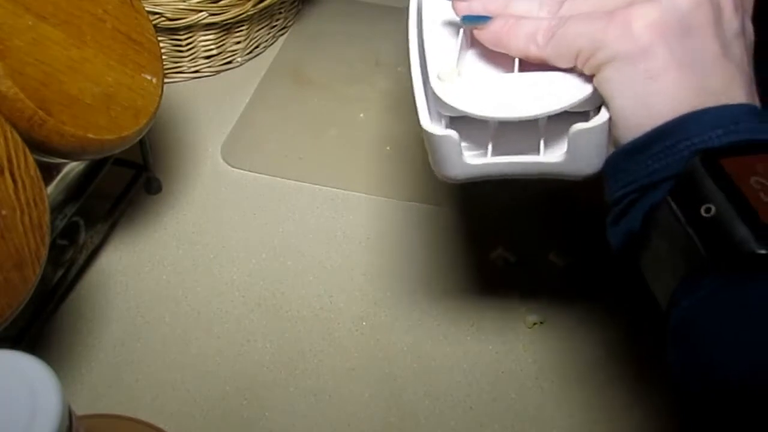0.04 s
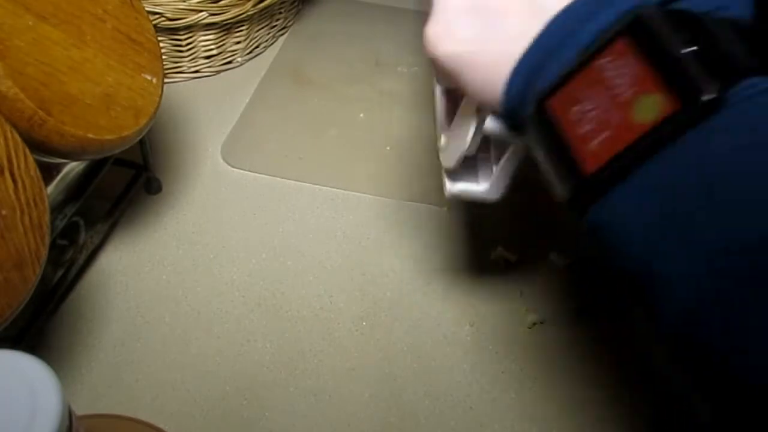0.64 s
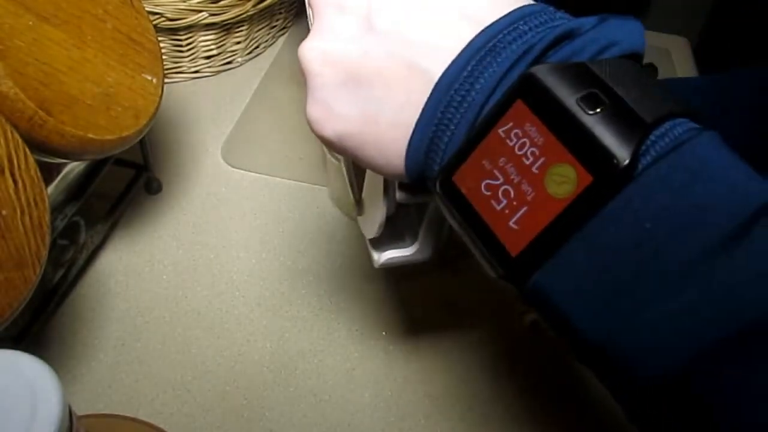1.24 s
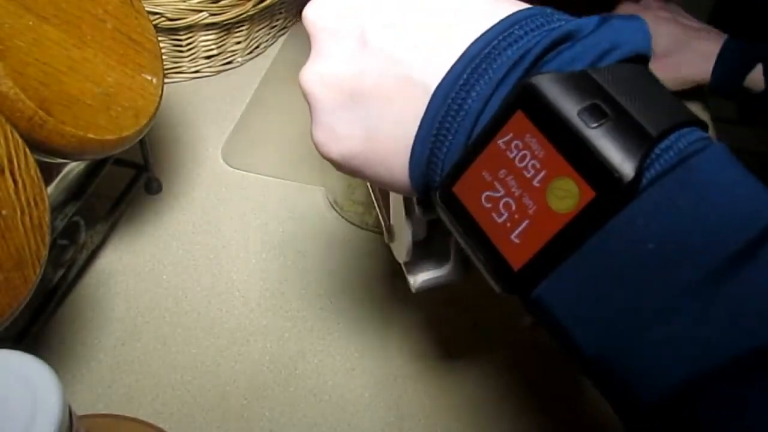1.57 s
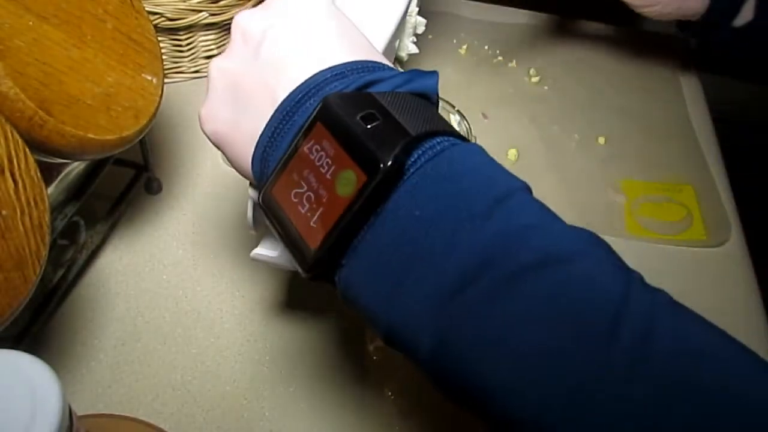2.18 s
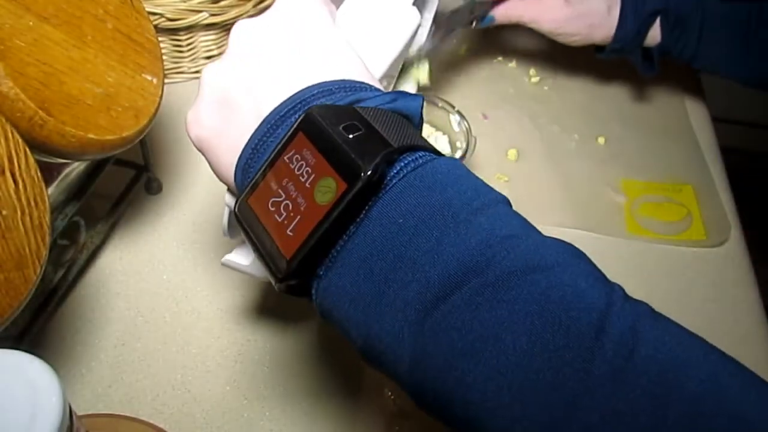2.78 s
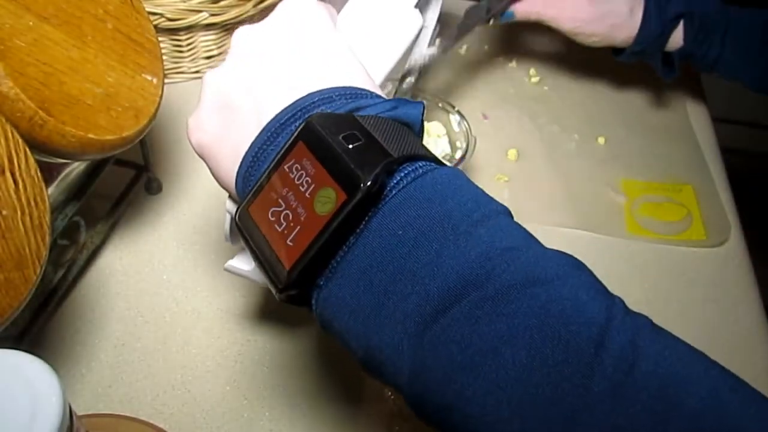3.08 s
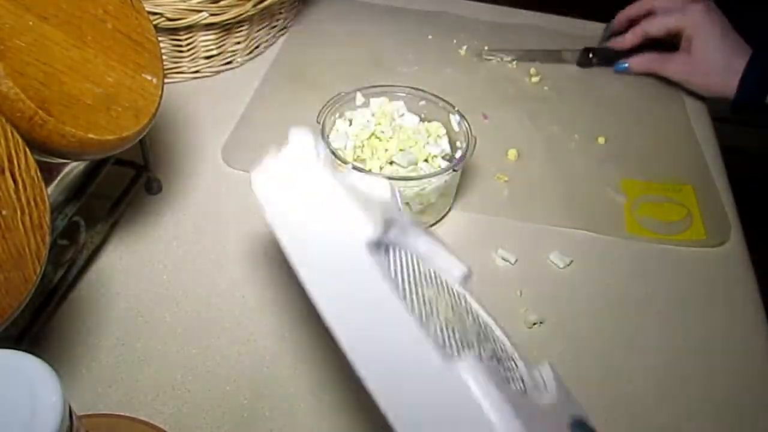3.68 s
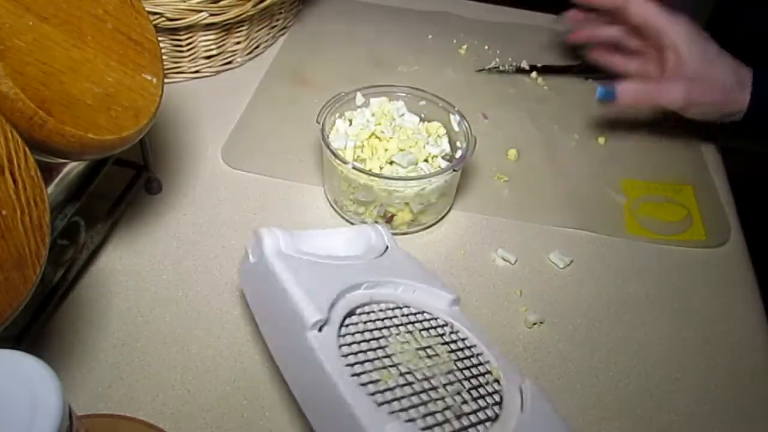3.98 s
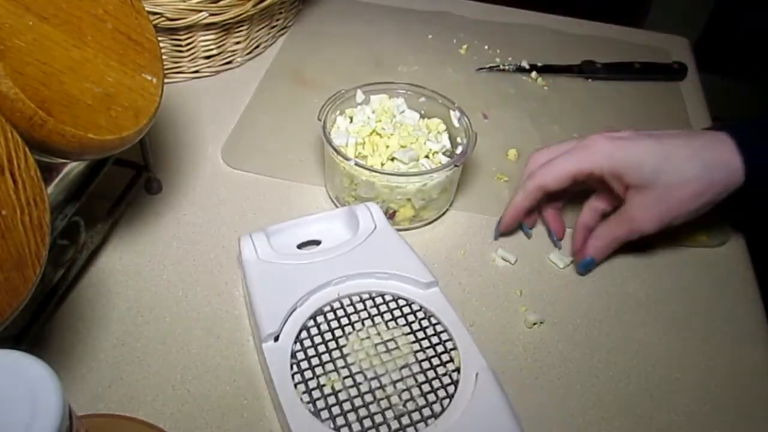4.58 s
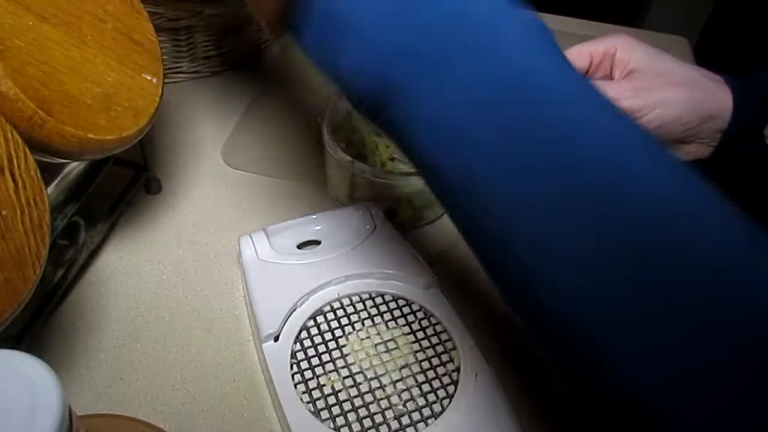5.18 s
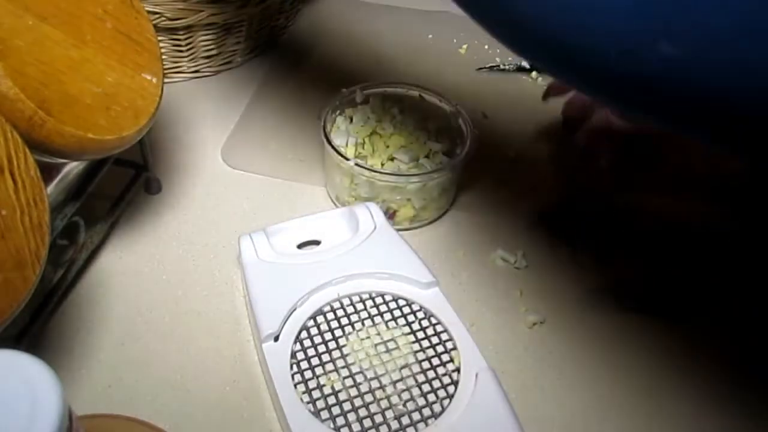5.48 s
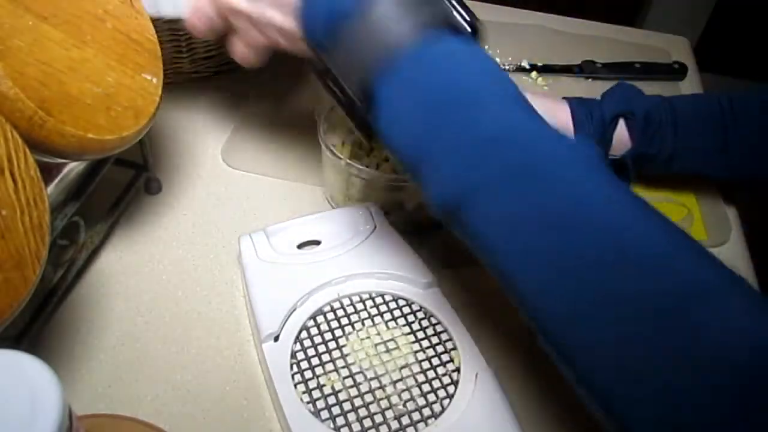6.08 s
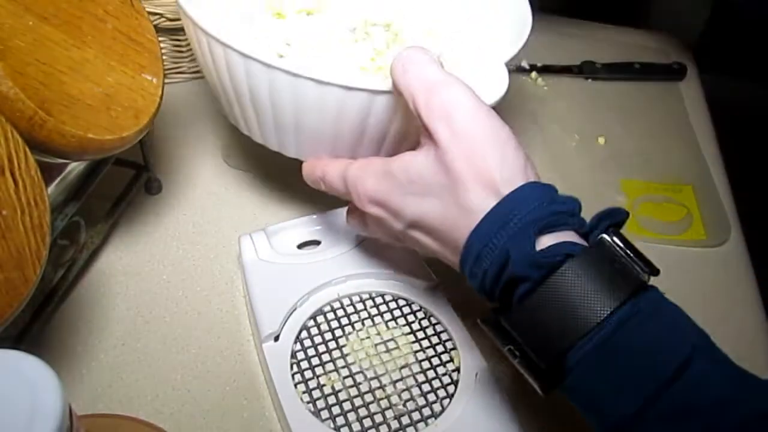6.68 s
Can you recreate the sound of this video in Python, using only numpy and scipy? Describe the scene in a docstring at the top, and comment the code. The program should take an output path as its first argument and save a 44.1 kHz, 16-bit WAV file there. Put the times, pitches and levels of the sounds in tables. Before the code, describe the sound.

A plastic vegetable chopper clacks, scrapes and is set down on a kitchen counter, then a cup slides and knocks against a bowl.

```python
"""A plastic dicing chopper is opened, scraped with a knife and laid on a kitchen counter.
Each impact excites damped modes: the shell clacks, the counter thumps, and the hardest blow rings the
blade grid. A cup and a bowl are knocked, slid and lifted; edges snap and stick-slip friction rasps.
A sleeve swishes and the small, reverberant room hums. The microphone's gain control ducks after
hard knocks, too late to keep their first swing from clipping."""
import sys
import numpy as np
from scipy import signal
from scipy.io import wavfile
from scipy.ndimage import minimum_filter1d

SR = 44100
rng = np.random.default_rng(int(sys.argv[2]) if len(sys.argv) > 2 else 0)


def wav_out(sig):
    """Save sig, one row per channel (or a flat mono array), as 16-bit PCM at SR to the path in sys.argv[1]."""
    wavfile.write(sys.argv[1], SR, np.round(np.clip(np.atleast_2d(sig).T, -1, 1) * 32767).astype(np.int16))


N = 306054
TIME = np.arange(N) / SR
BANDS_HZ = 32 * 2 ** (np.arange(28) / 3)   # third-octave centres
BAND_FILTERS = [signal.butter(2, [hz / 2 ** (1 / 6), hz * 2 ** (1 / 6)], "band", fs=SR, output="sos")
                for hz in BANDS_HZ]

# Chopper impacts: start_s, level_db, bass_db, treble_db, length_ratio, thump_db, clack_hz
CHOPPER_KNOCKS = [(1.261, 4, 2, 3.5, 0.88, -46, 836), (1.287, -17, 7, -5, .8, -48, 1200),
                  (1.3323, -6, 8.5, -30, 0.71, -50, 560), (1.638, -33, 9, 7, .8, -50, 250),
                  (2.591, -14, 4, 0, 0.8, -7.5, 990), (2.657, -22, 6.5, -12, 0.84, -16.5, 1090),
                  (2.860, -12, -2, 10, 0.59, -17.5, 1100), (2.873, -21, 5, -2, 0.88, -28, 1160),
                  (3.9417, -5, 6, 6, 0.54, -15, 1510), (3.971, -19.5, 0, -5, .8, -28, 650),
                  (4.2853, -12, 5.5, 7, 0.89, -18.5, 646), (4.3283, -7.5, -2.5, 6.5, 0.86, -10, 720),
                  (4.3753, -5, -7, -13, 0.63, -16, 950), (4.418, -16, 3.5, -6, 0.68, -22, 1190),
                  (4.432, -16.5, -4, -31, 0.86, -20, 710), (4.501, -21.5, -10, -3, 1, -50, 605),
                  (4.601, 0, -3.5, -19, 0.71, -12, 1080), (6.1344, -21, 4, 6, 0.68, -45, 331)]
# Cup and bowl impacts: start_s, level_db, bass_db, treble_db, pock_hz, pock_db, ring_db
CUP_TAPS = [(.241, -51, -12, 10, 910, -28, -33), (.265, -41, -12, 4, 960, -34, -28.5),
            (.416, -23, -6, 7, 874, -13.5, -23), (.698, -38, -10, 14, 934, -23.5, -50),
            (.847, -42, -10, 19, 1008, -32, -49), (3.497, -35.5, -10, -8, 990, -33.5, -58),
            (5.708, -30.5, -6, -5, 900, -35, -44), (5.736, -18, -3, 1, 808, -16, -35),
            (5.917, -8, -8.5, -26.5, 800, -16, -28), (6.516, 1, 11, -7, 910, -16, -3)]
# Knife and plastic edges snapping past each other: start_s, level_db, treble_db, pitch_hz
EDGE_SNAPS = [(1.639, -24, 15, 2420), (1.711, -28.5, 13.5, 8970), (2.244, -51, 22.5, 11500),
              (2.478, -19.5, 5, 1530), (2.561, -19.5, -18, 1730), (2.829, -16, -6, 1664),
              (2.841, -12.5, -7, 1080), (2.849, -20, 2, 2150), (3.683, -28.5, 2, 1850),
              (3.713, -30.5, 13, 1530), (4.2234, -25, 9.5, 4430), (6.097, -13, -3.5, 1820),
              (6.104, -26, 18.5, 2200), (6.134, -8.5, 4.5, 2410), (6.151, -19, 4, 2150),
              (6.171, -20.5, 19, 2930), (6.188, -18, 8, 3080), (6.214, -26.5, 20, 4500),
              (6.315, -27.5, 12.5, 1930), (6.328, -28.5, 10.5, 2880), (6.759, -32.5, 11.5, 4550)]
# Dragged contacts: start_s, level_db, pitch_hz, length_ratio
CONTACT_CREAKS = [(0.251, -38, 3030, 3.5), (0.812, -42, 3230, 3), (1.782, -42, 2030, 1.2),
                  (2.549, -28, 1290, 2.2), (2.707, -24, 1457, 3.6), (2.778, -26, 2010, 2.5),
                  (2.809, -27, 1210, 1.8), (3.631, -35.5, 1970, 1.2), (3.732, -35.5, 1560, 2.3),
                  (4.147, -31, 2124, 4), (4.216, -29.5, 2410, 5.7), (4.27, -20.5, 3070, 2.4),
                  (4.601, -15.5, 2390, 2.1)]

# Friction strokes: start_s, peak_db, swell_s, fade_s (time to fall by 20 dB)
GRITTY_SCRAPES = [(1.635, -38.5, 0.019, 0.25), (1.765, -40, .025, 0.027), (3.68, -35, 0.046, 0.04),
                  (5.73, -28.5, 0.24, 0.019), (6.085, -23.5, 0.073, 0.11), (6.28, -32, 0.081, 0.052)]
CUP_JUDDERS = [(6.09, -22, .05, 0.049)]
WALL_RUBS = [(0, -45.5, 0.0027, 0.16), (.205, -33, .05, 0.048), (.57, -45, 0.04, .03),
             (.645, -41.5, 0.017, .04)]
KNIFE_SKIMS = [(1.695, -39, .015, .05), (1.86, -52, .02, .06), (2.185, -49, .015, 0.088),
               (2.24, -71, .015, .04)]
SLEEVE_SWISHES = [(4.98, -49.5, .18, 0.27), (5.27, -54.5, 0.11, 0.83)]

# Distinct modes of each body: pitch_hz, level_db, t60_s
CHOPPER_SHELL_MODES = [(212, -20, 0.02), (416, 4.5, 0.0058), (2056, -14.5, 0.031), (4680, -31, 0.042)]
BLADE_GRID_MODES = [(190, -39.5, 0.28), (248, 3, 0.17), (338, -2, 0.43), (477.3, -0.5, 0.3),
                    (790, -8, 0.37), (980, 0, 0.21), (1120, 3, 0.11), (1210, 5, 0.059), (1323, 2, 0.12),
                    (2165, -25, 0.4), (2260, -26, 0.2), (6570, -19, 0.22)]
COUNTERTOP_MODES = [(80.3, -4.5, 0.33), (93, -4.5, 0.091)]
CUP_FLEX_MODES = [(708, 4.5, 0.01), (882, -6.5, 0.14), (950, -5, 0.034), (500, -13.5, 0.13),
                  (383, -13, 0.053), (684, -11.5, 0.0172)]
CUP_WALL_MODES = [(557, -36.5, 0.35), (824, -17, 0.57), (912, -7.5, 0.21), (922, -5, 0.32),
                  (955, -13.5, 0.42), (1068, -8, 0.15), (1305, -36, .05), (2150, -23, .15),
                  (2195, -30, 0.26), (3165, -15.5, 0.075)]
GRIPPED_CUP_MODES = [(897, 2, 0.054), (970, -2.7, 0.061), (1070, -3, 0.037), (4750, -6, 0.014)]

# Spectral densities of dense modes, friction and room noise: frequency_hz, density_db
CHOPPER_SPECTRUM = [(40, -10), (100, -22), (200, 8), (540, -11.5), (900, 6), (1500, -6.5), (2050, -3),
                    (2900, -16.5), (3900, -12), (4600, -18), (6500, -32.5), (9500, -26.5), (14000, -54)]
CUP_SPECTRUM = [(40, -51), (200, -23), (450, -6), (620, -31), (880, 8), (1400, -6), (2100, -1.5),
                (3300, -5), (4100, -6), (5000, -13.5), (7500, -46), (10000, -22.5), (14000, -62)]
EDGE_SPECTRUM = [(40, -5), (250, -1), (650, -2), (1100, 5.5), (2100, 2), (3200, -2.5), (3900, -4.5),
                 (4600, -3.5), (7500, -19), (10500, -7), (13000, -22), (16000, -38)]
GRIT_SPECTRUM = [(40, -12), (400, 0), (1000, 3), (2200, 0.5), (3300, 1.5), (3900, 1.5), (4700, 1.5),
                 (7500, -10.5), (9500, 1), (12000, -13.5), (14000, -23), (16000, -31)]
CUP_JUDDER_SPECTRUM = [(60, -23.5), (190, -1), (330, 9.5), (600, -31), (2200, -0.5), (5000, -47),
                       (14000, -47)]
KNIFE_SPECTRUM = [(2000, -25), (6000, -9), (9500, -1), (12500, 0), (15000, -20)]
CLOTH_SPECTRUM = [(200, -13), (1000, -1), (3000, 7), (5500, -2.5), (9000, -15), (15000, -14)]
AIR_SPECTRUM = [(15, -38), (25, -6), (113, -1), (144, -6), (183, 2.5), (233, -16.5), (331, -6.5),
                (782, -19), (1050, -18.5), (2170, -27.5), (3530, -29), (3930, -30.5), (5280, -32.5),
                (11500, -40.5), (15500, -58)]

# Decay of dense modes, before scaling by a contact's length ratio: frequency_hz, t60_s
BODY_DECAY = [(60, 0.34), (250, 0.1), (1000, 0.061), (3000, 0.053), (12000, 0.052)]
EDGE_DECAY = [(200, 0.06), (2000, 0.044), (12000, 0.028)]
# Reverberation time: frequency_hz, t60_s
ROOM_DECAY = [(80, 0.26), (400, 0.6), (2000, 0.45), (5000, 0.58), (13000, 0.19)]
# Colour of the reverberation: frequency_hz, density_db
ROOM_SPECTRUM = [(60, 1), (300, -4.5), (1000, 0.5), (4000, -1.5), (13000, 2)]
# Extra stereo spread, side relative to mid: frequency_hz, spread_db
STEREO_WIDTH = [(60, -9), (250, 1.5), (2000, 3), (5000, 3.5), (10000, 6.5), (14000, 7)]


def chopper(clack_db=3.5, clack_t60_s=0.011):
    """Impact excitation: a blow sets the shell's modes vibrating and drives those of the counter."""
    start_s, level_db, _, _, length_ratio, thump_db, clack_hz = np.transpose(CHOPPER_KNOCKS)
    shell = ring(impulses(start_s, level_db), CHOPPER_SHELL_MODES)
    shell = shell + clatter(CHOPPER_KNOCKS, CHOPPER_SPECTRUM, length_ratio)
    # The point of contact decides which panel takes the blow, and so the pitch of the clack.
    for at_s, db, hz in zip(start_s, level_db, clack_hz):
        add(shell, at_s, ping(hz, db + clack_db, clack_t60_s))
    counter = ring(impulses(start_s, thump_db), COUNTERTOP_MODES)
    return radiated(shell + blade_grid(), low_hz=156) + counter


def blade_grid(start_s=1.261, strike_db=-11.5, blade_hz=3370, spread_ratio=0.048, count=12):
    """Beating: nearly alike blades ring at slightly different pitches, beside the grid's own modes."""
    detune = spread_ratio * (np.linspace(-1, 1, count) + rng.uniform(-1, 1, count) / count)
    blade_modes = [(hz, -14, 0.37) for hz in blade_hz * (1 + detune)]   # pitch_hz, level_db, t60_s
    return ring(impulses(start_s, strike_db), BLADE_GRID_MODES + blade_modes)


def cup_and_bowl(clatter_db=-4.0, length_ratio=0.84, pock_t60_s=0.078):
    """Hollow-body resonance: a pock whose pitch depends on the grip, and a wall ringing near 900 Hz."""
    start_s, level_db, *_, ring_db = np.transpose(CUP_TAPS)
    body = from_db(clatter_db) * clatter(CUP_TAPS, CUP_SPECTRUM, [length_ratio] * len(CUP_TAPS))
    for at_s, *_, pock_hz, pock_db, _ in CUP_TAPS:
        add(body, at_s, -ping(pock_hz, pock_db, pock_t60_s))
    flex = ring(impulses(start_s, level_db), CUP_FLEX_MODES)
    wall = ring(impulses(start_s, ring_db), CUP_WALL_MODES)
    return radiated(body - flex - wall, low_hz=262)


def edge(level_db, pitch_hz, length_ratio, bass_db, treble_db, ring_db):
    """Free vibration: a released edge sounds a burst of dense modes around one resonance."""
    peak_db = 6.5 * np.exp(-(np.log2(BANDS_HZ / pitch_hz) / 0.29) ** 2)   # 0.29 octave to each side
    gains = band_gains(EDGE_SPECTRUM) * from_db(level_db + shelves(bass_db, treble_db) + peak_db)
    burst = dense_modes(gains, length_ratio * by_band(EDGE_DECAY))
    return burst + ping(pitch_hz, level_db + ring_db, t60_s=length_ratio * 0.015)


def snaps():
    """Elastic release: edges slip past each other in short snaps, each with its pitch and brightness."""
    out = np.zeros((2, N))
    for start_s, db, treble_db, hz in EDGE_SNAPS:
        add(out, start_s, edge(db, hz, length_ratio=0.63, bass_db=7.5, treble_db=treble_db, ring_db=1.5))
    return out


def creaks(attack_s=0.0037):
    """Gradual release: a dragged edge starts softly and sounds longer than a snap."""
    out = np.zeros((2, N))
    for start_s, db, hz, length_ratio in CONTACT_CREAKS:
        creak = edge(db, hz, length_ratio, bass_db=2.5, treble_db=-4, ring_db=6)
        onset = np.minimum(TIME[:creak.shape[1]] / attack_s, 1)
        add(out, start_s, creak * onset)
    return out


def scraping():
    """Stick-slip friction: a knife scrapes plastic, then a cup slides and judders, with a gritty hiss."""
    grit = friction(GRITTY_SCRAPES, GRIT_SPECTRUM, slips_per_s=1800, slip_s=0.0005, scatter_db=2)
    judder = friction(CUP_JUDDERS, CUP_JUDDER_SPECTRUM, slips_per_s=400, slip_s=0.003, scatter_db=2)
    return grit + judder


def rubbing(modes_db=-29):
    """Forced vibration: plastic rubbing on the cup wall drives its hand-damped modes."""
    rub = friction(WALL_RUBS, CUP_SPECTRUM, slips_per_s=570, slip_s=0.003)
    return rub + from_db(modes_db) * ring(rub, GRIPPED_CUP_MODES)


def knife():
    """Friction at a thin contact: a steel edge skims the mat with a fine, high rasp."""
    return friction(KNIFE_SKIMS, KNIFE_SPECTRUM, slips_per_s=790, slip_s=0.0007)


def sleeve():
    """Friction of soft cloth: a smooth swish of noise follows each stroke."""
    return pressure(SLEEVE_SWISHES) * band_noise(band_gains(CLOTH_SPECTRUM))


def reverberation(direct, wet_db=-10.5, gap_s=0.0036):
    """Diffuse field: after a short gap, the room's reflections merge into a decaying tail."""
    tail = dense_modes(band_gains(ROOM_SPECTRUM), by_band(ROOM_DECAY), size=SR // 2, spread_db=-14.5)
    tail *= np.clip(TIME[:SR // 2] / gap_s - 1, 0, 1)
    tail /= np.sqrt(np.sum(tail ** 2) / 2)   # unit energy per channel
    return from_db(wet_db) * signal.fftconvolve(direct, tail, axes=1)[:, :N]


def room_tone(air_db=-36, hum_hz=115.9, hum_db=-45.5):
    """Stationary background: broadband noise, strongest in the bass, and a pure-tone hum."""
    air = from_db(air_db) * band_noise(band_gains(AIR_SPECTRUM), spread_db=-4.5)
    hum = from_db(hum_db) * np.sin(2 * np.pi * hum_hz * TIME)
    return air + hum


def impulses(start_s, level_db):
    """Impulsive force: each brief contact is a single click."""
    force = np.zeros(N)
    force[np.round(start_s * SR).astype(int)] = from_db(level_db)
    return force


def ring(force, modes):
    """Modal superposition: each mode answers an impulse with a decaying sine."""
    out = 0
    for pitch_hz, level_db, t60_s in modes:
        radius = np.exp(-np.log(1000) / (t60_s * SR))
        angle = 2 * np.pi * pitch_hz / SR
        feedback = [1, -2 * radius * np.cos(angle), radius * radius]
        out = out + from_db(level_db) * signal.lfilter([0, np.sin(angle)], feedback, force + 1e-18)
    return out


def ping(pitch_hz, level_db, t60_s):
    """Impulse response of one damped oscillator."""
    return ring(signal.unit_impulse(SR // 6), [(pitch_hz, level_db, t60_s)])[None]


def clatter(contacts, spectrum, length_ratios):
    """Damping: each contact excites a body's dense modes, and a firm grip cuts them short."""
    out = np.zeros((2, N))
    for (start_s, level_db, bass_db, treble_db, *_), ratio in zip(contacts, length_ratios):
        gains = band_gains(spectrum) * from_db(level_db + shelves(bass_db, treble_db))
        add(out, start_s, dense_modes(gains, ratio * by_band(BODY_DECAY)))
    return out


def dense_modes(gains, t60_s, size=SR // 6, spread_db=-13.5):
    """Modal overlap: crowded modes act as noise that decays exponentially in each band."""
    envelopes = np.exp(-np.log(1000) * np.arange(size) / SR / t60_s[:, None])
    return band_noise(gains, envelopes, size, spread_db)


def shelves(bass_db, treble_db):
    """Spectral shelving: a contact's own bass and treble offsets, in dB by band."""
    return bass_db * by_band([(300, 1), (800, 0)]) + treble_db * by_band([(2000, 0), (8000, 1)])


def radiated(vibration, low_hz):
    """Radiation efficiency: small objects give off almost no deep bass."""
    return signal.sosfilt(signal.butter(2, low_hz, "high", fs=SR, output="sos"), vibration)


def friction(strokes, spectrum, slips_per_s, slip_s, scatter_db=0.0):
    """Shot noise: tiny random slips each release a short burst, and their powers add."""
    slipping = rng.random(N) < slips_per_s / SR
    slips = slipping * from_db(scatter_db * np.minimum(rng.exponential(1, N), 4))
    power = signal.lfilter([1], [1, -np.exp(-1 / (slip_s * SR))], slips ** 2 + 1e-18)
    envelope = pressure(strokes) * np.sqrt(power / power.mean())
    return band_noise(band_gains(spectrum), envelope)


def pressure(strokes, swell_power=0.75):
    """Contact pressure as a gain: each stroke swells with the push, then decays exponentially."""
    out = np.zeros(N)
    for start_s, peak_db, swell_s, fade_s in strokes:
        push = np.clip((TIME - start_s) / swell_s, 0, 1) ** swell_power
        fade_db = 20 * np.maximum(TIME - start_s - swell_s, 0) / fade_s
        out += push * from_db(peak_db - fade_db)
    return out


def band_noise(gains, envelopes=1.0, size=N, spread_db=-13.0):
    """Partial coherence: third-octave noise whose stereo image widens in the treble."""
    white = rng.standard_normal((2, 2, size))
    envelopes = np.broadcast_to(envelopes, (len(BANDS_HZ), size))
    out = np.zeros((2, size))
    for k, width in enumerate(from_db(by_band(STEREO_WIDTH) + spread_db)):
        mid, side = gains[k] * signal.sosfilt(BAND_FILTERS[k], white[k % 2] * envelopes[k] + 1e-18)
        out += np.array([mid + width * side, mid - width * side]) / np.hypot(1, width)
    return out


def band_gains(spectrum):
    """Band powers add: these gains shape white noise to the spectrum at about unit rms."""
    gains = from_db(by_band(spectrum))
    bandwidth_share = BANDS_HZ * (2 ** (1 / 6) - 2 ** (-1 / 6)) / (SR / 2)
    return gains / np.sqrt(np.sum(gains ** 2 * bandwidth_share))


def by_band(points):
    """Interpolation in log frequency, at the band centres."""
    frequency_hz, value = np.transpose(points)
    return np.interp(np.log(BANDS_HZ), np.log(frequency_hz), value)


def from_db(db):
    """Decibels to amplitude ratio."""
    return 10 ** (np.asarray(db) / 20)


def add(out, start_s, sound):
    """Superposition: a sound joins the mix at its start time."""
    part = out[:, max(round(start_s * SR), 0):][:, :sound.shape[1]]
    part += sound[:, :part.shape[1]]


def gain_control(sound, threshold_db=-2.5, hold_s=0.19, release_s=0.74, attack_s=0.0027):
    """Compression: peaks over the threshold quickly lower the gain, which holds, then creeps back."""
    peak_db = 20 * np.log10(np.abs(sound).max(axis=0) + 1e-9)
    excess_db = np.maximum(peak_db - threshold_db, 1e-6)
    excess_db[0] = 6.5   # the sound opens with the gain turned down
    half_hold = int(hold_s * SR / 2)
    held_db = -minimum_filter1d(-excess_db, 2 * half_hold + 1, origin=half_hold, mode="nearest")
    release = TIME / release_s
    cut_db = np.exp(np.maximum.accumulate(np.log(held_db) + release) - release)
    pole = np.exp(-1 / (attack_s * SR))
    return sound * from_db(-signal.lfilter([1 - pole], [1, -pole], cut_db))


def scene():
    """Direct and diffuse sound add: close handling over the room tone, all slightly to the left."""
    contacts = chopper() + cup_and_bowl() + snaps() + creaks() + scraping() + rubbing() + knife()
    handling = radiated(contacts, low_hz=55)
    background = room_tone()
    balance = from_db([[0.45], [-0.45]])
    return (handling + reverberation(handling) + sleeve() + background) * balance


def record(dry, dip_hz=3986, dip_q=10.3, dip_depth=0.9, stopband_hz=16473):
    """Transduction: a narrow dip in the microphone's response, gain control, clipping and a top cut."""
    dip_band = signal.lfilter(*signal.iirpeak(dip_hz, dip_q, fs=SR), dry)
    clipped = np.clip(gain_control(dry - dip_depth * dip_band), -1, 1)
    top_cut = signal.cheby2(14, 70, stopband_hz, fs=SR, output="sos")
    return signal.sosfilt(top_cut, clipped)


dry = scene()
out = record(dry)
wav_out(out)
```